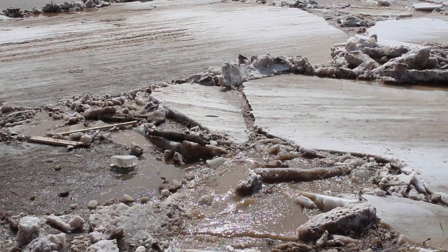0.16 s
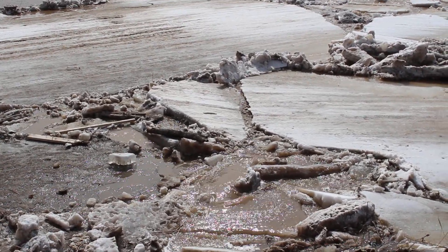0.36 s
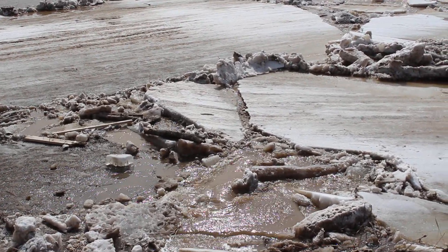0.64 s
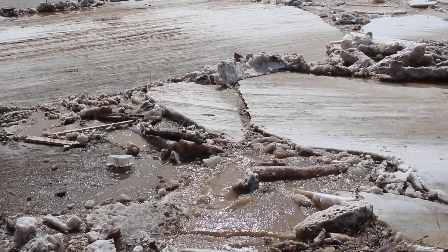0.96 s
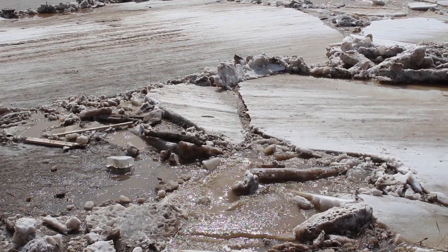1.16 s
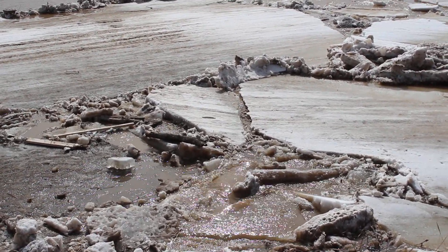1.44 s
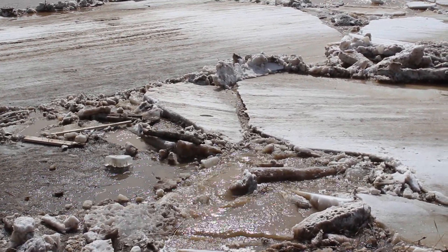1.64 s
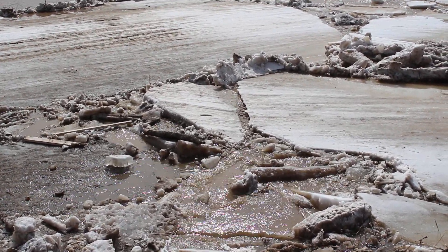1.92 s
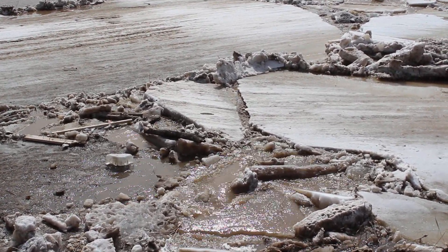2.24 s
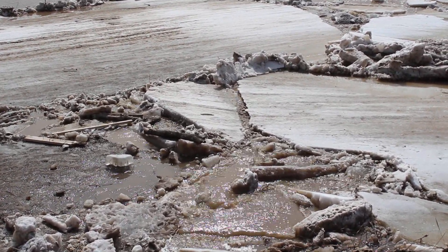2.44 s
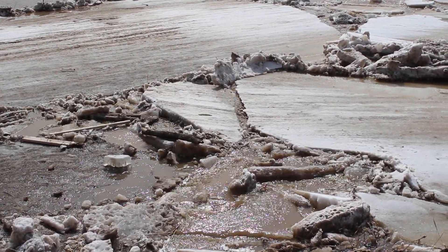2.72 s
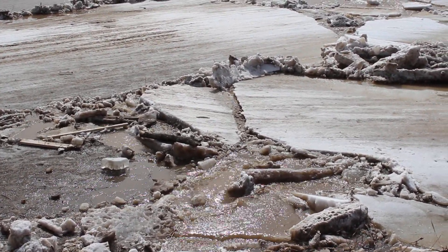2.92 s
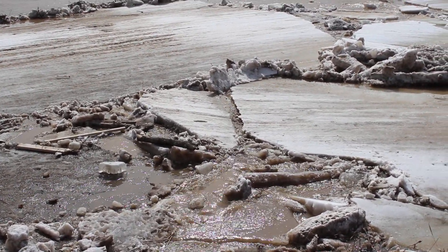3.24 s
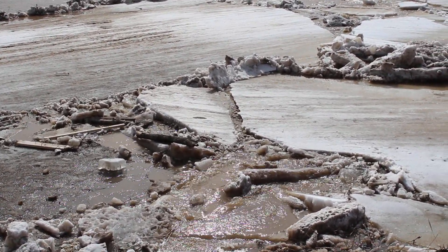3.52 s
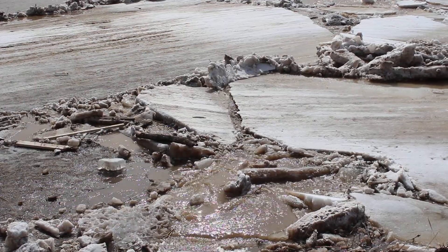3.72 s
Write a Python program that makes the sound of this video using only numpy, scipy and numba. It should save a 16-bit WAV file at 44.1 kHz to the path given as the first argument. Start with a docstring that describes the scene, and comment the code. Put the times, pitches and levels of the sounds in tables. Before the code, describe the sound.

Wind buffeting on a small stereo microphone dominates: dull, low, irregular thumps jumping between left and right. It is busy from 0 to 0.9 seconds, somewhat looser until 1.6, then surges to distorted blasts around 1.7-2.0. It eases through 2.2-3.5 and slams hard on the left at 3.8. Faint meltwater rushes steadily beneath, bubbling, with tiny splashes and ice ticks, densest around 1-2.4, dipping under loud gusts.

```python
"""Icy meltwater in gusty wind

Meltwater rushes between jammed ice slabs: bands of noise, with bubbles and ice crumbs as tiny rings.
Splashes and ice chinks are a tick plus a cluster of short rings. Wind buffets the two ports of a small
camera microphone as low thumps, and its stereo widener copies each one upside down to the other side.
The loudest buffets hit full scale, and the gain control turns everything down, so the river ducks."""
import sys
import numpy as np
from scipy import signal
from scipy.fft import rfft, irfft
from scipy.io import wavfile
from scipy.ndimage import uniform_filter1d
from numba import njit

SR = 44100
rng = np.random.default_rng(int(sys.argv[2]) if len(sys.argv) > 2 else 0)


def output_pcm(signal):
    """Save a mono or channel-first signal as 16-bit PCM at the path in sys.argv[1].

    Samples are clipped to [-1, 1] before scaling.
    """
    pcm = np.clip(np.atleast_2d(signal).T, -1, 1) * 32767
    wavfile.write(sys.argv[1], SR, np.round(pcm).astype(np.int16))


N = 170667  # length of the sound in samples

# How loud the river is heard, including slow drifts of the recorder's gain.
# Each row: time in seconds, level in dB.
RIVER_LEVEL = [(0, -41.5), (.3, -41.5), (.6, -44), (.9, -43), (1.2, -39), (1.45, -37.5), (1.65, -37.5),
               (1.9, -37), (2.1, -37.5), (2.45, -41), (2.7, -40), (3.1, -37.5), (3.4, -38.5), (3.87, -38.5)]
# The tone colour of the rushing water. Each row: frequency in Hz, relative level in dB per Hz.
RIVER_COLOUR = [(250, 10), (400, -3), (690, 0.5), (1000, -2.5), (1500, -7), (1900, -2), (2400, -9.5),
                (3300, -13), (4340, -15.5), (5080, -21), (8410, -24), (12000, -33), (15600, -39)]
# How wide the river sounds. Each row: frequency in Hz, side (left-right difference) minus mid in dB.
RIVER_WIDTH = [(300, -18.5), (1400, -15), (3000, -13.5), (6000, -9.5), (9000, -12), (13000, -8.5)]
# Splashes and ice chinks. Each row: start in seconds, level in dB before SPLASH_DB is added,
# centre pitch in Hz, length in ms before SPLASH_RING, pitch spread in octaves before SPLASH_SPREAD.
SPLASHES = [(0.0985, -52, 9043.0, 5.1, 0.44), (0.1464, -53, 5424.0, 3.6, 0.23),
            (0.5985, -50, 4300, 3.6, 0.28), (0.9308, -39, 1970, 9.4, 0.27), (0.9533, -54, 7400, 3.6, 0.17),
            (0.953, -41, 3400, 7.3, 0.75), (1.0977, -57, 10043.0, 3.6, 0.29),
            (1.1891, -54, 8242.0, 3.6, 0.21), (1.2479, -57, 10228.0, 4.4, 0.34),
            (1.2479, -59, 7960, 3.6, 0.35), (1.2744, -36.5, 2570, 12.3, 0.48),
            (1.34, -37.5, 4800, 10.2, 1.39), (1.401, -35.5, 2770, 6.5, 1), (1.7493, -44, 3820.0, 6.5, 0.51),
            (1.784, -51, 7774.0, 5.8, 0.31), (1.8023, -47.5, 6300, 9.4, 1.1),
            (1.8095, -50, 7400, 9.4, 0.43), (1.8139, -41.5, 4420, 7.3, 0.51),
            (1.8585, -46.5, 4131.0, 5.8, 0.83), (1.866, -68, 9427.0, 3.6, 0.23),
            (1.9513, -36, 3262.0, 5.1, 0.46), (2.0136, -52, 7160, 3.6, 0.18),
            (2.0207, -53, 9660.0, 4.4, 0.39), (2.021, -36, 3200, 6.5, 1.5), (2.0497, -74, 9000, 8.7, 0.73),
            (2.0497, -47, 6021.0, 5.1, 0.3), (2.07, -50, 8464.0, 4.4, 0.34), (2.236, -57.4, 6800, 8.0, 0.9),
            (2.3125, -38.2, 1849.0, 5.8, 0.4), (2.3726, -40, 3270, 4.4, 0.51),
            (2.5475, -50, 5752.0, 5.1, 0.67), (2.578, -54, 9400, 5.8, 0.51),
            (2.6745, -57, 10040.0, 4.4, 0.25), (2.9792, -52, 8700, 11.6, 0.79),
            (3.0041, -43, 3877.0, 5.8, 0.52), (3.1527, -56, 8800, 4.4, 0.22),
            (3.2571, -59, 10326.0, 2.9, 0.28), (3.3323, -45.5, 4600, 8.7, 1.1), (3.5, -49, 7300, 3.6, 0.57),
            (3.5, -50.5, 4900, 7.3, 0.64), (3.5256, -58.0, 8600, 3.6, 0.28),
            (3.7607, -50, 2650.0, 10.2, 0.66), (3.7615, -55.5, 6400, 4.4, 0.39),
            (3.7687, -58, 8767.0, 7.3, 0.22), (3.782, -66, 10729.0, 13.1, 0.73),
            (3.7827, -49.5, 6030, 5.1, 1.2)]
# Wind between the big buffets. Each row: time in seconds, left port level in dB,
# right port level in dB, brightness in dB (which moves the pitch of the small eddies).
GUSTS = [(0.0, -16.5, -33, -2), (0.07, -29, -27.0, -5), (0.15, -21, -18.5, -6.0), (0.25, -22.5, -23, -12),
         (0.4, -20, -19, -4), (0.5, -15, -13, 2), (0.65, -20, -16, -5), (0.8, -18.0, -16, 0),
         (0.92, -19.5, -15.5, -11), (1.02, -15.5, -19, -2), (1.12, -24, -23, -11),
         (1.24, -24.0, -20.5, -7.5), (1.33, -15.5, -17.5, -9), (1.42, -25.0, -16.5, -5),
         (1.5, -24, -27, -14.5), (1.59, -22, -26, -18.5), (1.7, -18, -13.5, -6.5),
         (1.8, -13.5, -10.5, -11.5), (1.9, -9, -4.5, -9.0), (1.98, -11.5, -46, -6.0), (2.05, -15, -20, -12),
         (2.14, -22, -24, -10), (2.25, -17, -17, -13), (2.34, -27, -17.5, -15), (2.45, -25, -19, -4),
         (2.55, -22.5, -21, -14.5), (2.68, -25, -31.5, -11.5), (2.8, -16.5, -25, -12.5),
         (2.92, -22, -20, -16), (3.05, -24, -18.5, -13), (3.14, -27.0, -27.5, -9.5),
         (3.22, -24.0, -32, -14), (3.33, -32, -39, -16), (3.42, -24.0, -25.5, -10),
         (3.5, -25.5, -29.0, -16), (3.6, -13.5, -14, -6.0), (3.7, -13, -14.5, -12.5), (3.8, -18, -24, -8.5),
         (3.87, -18, -13.5, -3)]
# Big wind buffets. Each row: time of the middle in seconds, port (-1 left, +1 right),
# level in dB before the snap is added, pitch in Hz, length in cycles (width at half height).
BUFFETS = [(0.0379, -1.0, -7, 122, 1.1), (0.1012, -1.0, -12, 123, 2.1), (0.1014, 1.0, -5, 219, 0.92),
           (0.1247, 1.0, -4, 148.0, 0.33), (0.2491, -1.0, -7, 152, 0.99), (0.2614, 1.0, -8.5, 200, 0.82),
           (0.289, 1.0, -7, 143, 0.82), (0.298, -1.0, -10.5, 129.0, 0.74), (0.3287, 1.0, -9, 220, 0.9),
           (0.3526, 1.0, -9, 175.0, 1.7), (0.3919, -1.0, -3.5, 145, 0.36), (0.418, 1.0, -4.8, 171.0, 0.8),
           (0.4529, 1.0, -1.5, 170, 0.95), (0.512, 1.0, 1, 220, 0.84), (0.5306, -1.0, -12, 172.0, 2),
           (0.542, 1.0, -19, 173, 0.59), (0.5675, 1.0, -7, 177, 1.1), (0.5983, -1.0, -4, 210, 0.6),
           (0.6411, 1.0, -3, 173, 0.89), (0.6585, 1.0, -8, 197, 1.1), (0.6836, -1.0, -2.8, 198.0, 0.6),
           (0.7068, 1.0, -9.5, 219.0, 0.84), (0.7244, -1.0, -12.5, 193, 2.1),
           (0.7582, 1.0, -7.5, 175.0, 0.69), (0.79, -1.0, -6.5, 170, 1.7), (0.8076, 1.0, -10.5, 156, 1.8),
           (0.8373, -1.0, -12, 165, 1.4), (0.8539, 1.0, -15, 174, 1.4), (0.9946, -1.0, -12.5, 178, 1.5),
           (1.0274, 1.0, -11.5, 148.0, 0.6), (1.0497, 1.0, -6.5, 177, 0.72),
           (1.169, -1.0, -12.5, 124.0, 1.6), (1.1925, 1.0, -6.5, 137, 0.56),
           (1.2851, -1.0, -2.5, 120, 0.94), (1.306, 1.0, -1.5, 150, 0.77), (1.3228, -1.0, -8, 152, 1.2),
           (1.3644, -1.0, -10, 214, 1.6), (1.4138, 1.0, -5.5, 257, 0.83), (1.6743, 1.0, 0, 195, 0.62),
           (1.676, -1.0, -0.8, 141, 1.1), (1.7219, 1.0, -4, 194, 0.67), (1.7369, -1.0, -6, 114.0, 2),
           (1.757, 1.0, -4, 160, 1.5), (1.7574, -1.0, -2.5, 125.0, 1.3), (1.8044, -1.0, -9, 123, 0.8),
           (1.8151, 1.0, -9, 117.0, 0.6), (1.8491, 1.0, 2, 141, 0.59), (1.8728, -1.0, -1, 147, 3.1),
           (1.876, 1.0, 5, 203, 0.33), (1.921, 1.0, 5.9, 216, 2), (1.9614, 1.0, -0.5, 212, 1.6),
           (1.984, 1.0, 2.8, 226, 0.89), (2.0982, -1.0, -8.6, 126, 2.7), (2.1761, -1.0, -3.5, 110, 1.3),
           (2.186, 1.0, -5, 142, 0.8), (2.2111, 1.0, -3, 150, 1.4), (2.3193, 1.0, -3, 138, 0.74),
           (2.3375, 1.0, -4, 126, 2.56), (2.389, -1.0, -9.6, 124, 1.3), (2.392, 1.0, -1, 127, 1.24),
           (2.5368, 1.0, -6, 140.0, 0.84), (2.5763, -1.0, -12.5, 124, 1.7), (2.6262, -1.0, -5.5, 132, 1.1),
           (2.6495, -1.0, -5.5, 112, 1.2), (2.7672, -1.0, -6, 147, 0.63), (2.7686, 1.0, -9.5, 149, 2.5),
           (2.8159, -1.0, -11, 132, 0.54), (2.897, -1.0, -14, 144.0, 0.68), (2.9799, -1.0, -13, 107, 1.3),
           (2.9887, 1.0, -9, 144.0, 1.1), (3.0554, -1.0, -7.5, 127, 0.75), (3.0693, 1.0, -8, 151, 0.57),
           (3.0955, 1.0, -9.5, 139.0, 1.3), (3.39, -1.0, -7.9, 108, 0.93), (3.4798, -1.0, -9, 107, 1.04),
           (3.5747, -1.0, -10.5, 187, 4.3), (3.5886, 1.0, -1.5, 195, 0.89), (3.6113, -1.0, -19, 137.0, 0.6),
           (3.6545, -1.0, -4.5, 177, 0.84), (3.6829, -1.0, -6, 115, 3.2), (3.7145, -1.0, -2, 130, 0.72),
           (3.7907, -1.0, 6.5, 123, 1.07), (3.811, -1.0, 4, 147, 1.5), (3.8359, -1.0, 6.5, 186.0, 1.3)]

# River: how far its level wanders, how often it gets a new level, and its lean to the left
SWELL_DB, FLICKER_DB = 1.42, 1.5
SWELL_PER_S, FLICKER_PER_S = 35, 40
RIVER_PAN_DB = .5

# Tiny bubbles: level is relative to the rush, cycles last until the ring is 60 dB down
FIZZ_PER_S, FIZZ_HZ, FIZZ_SPREAD_OCT, FIZZ_CYCLES = 1300, 1899.5, 0.746, 37
FIZZ_DB, FIZZ_SCATTER_DB = -4.5, 3.5
RING_TILT_DB_OCT = -3  # higher bubbles and crumbs are quieter

# Ice crumbs, in the same units
CRACKLE_PER_S, CRACKLE_HZ, CRACKLE_SPREAD_OCT, CRACKLE_CYCLES = 90, 5100, .5, 4.9
CRACKLE_DB, CRACKLE_SCATTER_DB = -21.5, 3

# Splashes: added level, factors for length and pitch spread, rings in each, and the opening tick
SPLASH_DB, SPLASH_RING, SPLASH_SPREAD, DROPS = 10, 1.6, 0.66, 5
TICK_DB, TICK_CYCLES = -1, 8
GLIDE = 0.051  # upward bend of the rings of bubbles, crumbs and drops

# Wind: small eddies at each port, the snap inside every thump, and the low cut
EDDIES_PER_S, EDDY_HZ, EDDY_SPREAD_OCT, EDDY_OCT_PER_DB = 280, 190.2, 0.49, 0.0567
EDDY_CYCLES, EDDY_SCATTER_DB = 0.92, 3
SNAP_RATIO, SNAP_DB = 1.96, -14  # snap speed and level compared with the main dip
WIND_LOW_HZ = 37

# Microphone: share of the other side taken away, gain control, full scale, and top of the range
WIDEN = 0.38
CEILING_DB, ATTACK_S, RELEASE_S, CLIP_DB = -3.5, .0008, .3, 0
TOP_HZ = 15780


def amp(db):
    """Turn dB into a plain multiplier."""
    return 10 ** (np.asarray(db) / 20)


def curve(table, col):
    """Draw straight lines in time through one column of a table."""
    table = np.array(table, float)
    return np.interp(np.arange(N) / SR, table[:, 0], table[:, col])


def at_hz(table, hz):
    """Read a level from a table by frequency, on a musical (log) scale."""
    table = np.array(table, float)
    return np.interp(np.log(hz), np.log(table[:, 0]), table[:, 1])


def walk(rate):
    """Random levels, rate of them a second, smoothed twice; spread near 1."""
    hold = int(SR / rate)
    steps = np.repeat(rng.standard_normal(N // hold + 1), hold)
    smooth = uniform_filter1d(uniform_filter1d(steps, hold), hold)
    return 1.05 * smooth[:N]


def place(times, shapes, lead):
    """Sum short shapes into a track, each starting lead samples before its time."""
    at = (times * SR).astype(int)[:, None] + np.arange(shapes.shape[1])
    track = np.bincount(at.ravel(), shapes.ravel(), N + 8192)
    return track[lead:N + lead]


def rings(times, db, hz, cycles, glide):
    """Short rings with a soft start and a pitch bend; cycles counts until 60 dB down."""
    hz = np.minimum(hz, .3 * SR)
    turn = np.arange(768) / SR * hz[:, None]  # cycles since the start
    age = turn / np.reshape(cycles, (-1, 1))
    fade = np.minimum(age * 16, 1) * np.exp(-np.log(1000) * age)
    tone = np.sin(2 * np.pi * turn * (1 + glide * np.minimum(age, 1)))
    return place(times, amp(db)[:, None] * fade * tone, 0)


def scatter(per_s, hz, spread_oct, cycles, scatter_db, tilt_db):
    """Rings at random times, pitches and sizes, scaled to an average (rms) level of 1."""
    count = int(per_s * N / SR)
    times, size = rng.random((count, 2)).T
    octs = spread_oct * np.clip(rng.standard_normal(count), -1.6, 2.5)
    db = -scatter_db * np.log(1 - .995 * size) + tilt_db * octs  # a few are much louder
    out = rings(times * N / SR, db, hz * 2 ** octs, cycles, GLIDE)
    return out / out.std()


def rush():
    """Flowing water: third-octave noise bands that surge together and flicker alone."""
    out, swell = 0, walk(SWELL_PER_S)
    freqs = np.fft.rfftfreq(N, 1 / SR) + 1
    for hz in 250 * 2 ** np.arange(0, 6.2, 1 / 3):
        bell = np.exp(-(np.log2(freqs / hz) * 4) ** 2)
        band = bell * amp(at_hz(RIVER_COLOUR, freqs))
        mid, side = irfft(rfft(rng.standard_normal((2, N))) * band, N)
        side = amp(at_hz(RIVER_WIDTH, hz)) * side
        gain = amp(SWELL_DB * swell + FLICKER_DB * walk(FLICKER_PER_S))
        out = out + gain * (mid + side * np.array([[1], [-1]]))
    return out / out.std()


def bubbles():
    """Tiny bubbles plink: each is a short ring that bends upward."""
    fizz = scatter(FIZZ_PER_S, FIZZ_HZ, FIZZ_SPREAD_OCT, FIZZ_CYCLES,
                   FIZZ_SCATTER_DB, RING_TILT_DB_OCT)
    return amp(FIZZ_DB) * fizz


def ice_crumbs():
    """Ice crumbs crackle: fewer, higher rings that last only a few cycles."""
    crackle = scatter(CRACKLE_PER_S, CRACKLE_HZ, CRACKLE_SPREAD_OCT, CRACKLE_CYCLES,
                      CRACKLE_SCATTER_DB, RING_TILT_DB_OCT)
    return amp(CRACKLE_DB) * crackle


def river():
    """Rush, bubbles and crumbs share one loudness curve, which includes slow gain drift."""
    water = rush() + bubbles() + ice_crumbs()
    pan = amp([[RIVER_PAN_DB / 2], [-RIVER_PAN_DB / 2]])
    return water * amp(curve(RIVER_LEVEL, 1)) * pan


def ice():
    """Each splash is a dry tick, one ring at its centre pitch and shorter drops scattered around it."""
    start, db, hz, ms, spread = np.repeat(np.array(SPLASHES, float), DROPS, axis=0).T
    db = db + SPLASH_DB
    order = np.tile(np.arange(DROPS) / DROPS, len(SPLASHES))  # 0 is the main ring
    late, pitch = rng.random((len(start), 2)).T
    ticks = rings(start[::DROPS], db[::DROPS] + TICK_DB, 1.33 * hz[::DROPS], TICK_CYCLES, 0)
    hz = hz * 2 ** (SPLASH_SPREAD * spread * (pitch - .5) * (order > 0))
    cycles = SPLASH_RING * ms / 1000 * hz / (1 + 1.4 * order)
    times = start + ms / 1400 * order * late
    return ticks + rings(times, db - 6 * order, hz, cycles, GLIDE)


def dip(turn, cycles):
    """A downward pressure peak in a bell-shaped envelope, cycles wide at half height."""
    bell = np.exp(-4 * np.log(2) * (turn / cycles) ** 2)
    return -bell * np.cos(2 * np.pi * turn)


def thumps(times, db, hz, cycles):
    """Passing eddies suck at the port: a pressure dip with a quicker snap at its core."""
    turn = np.arange(-1024, 1024) / SR * hz[:, None]
    snap = amp(SNAP_DB) * dip(SNAP_RATIO * turn, 0.95)
    shape = dip(turn, np.reshape(cycles, (-1, 1))) + snap
    return place(times, amp(db)[:, None] * shape, 1024)


def small_eddies(port):
    """A patter of small thumps at random times, higher in pitch when the gust is brighter."""
    count = int(EDDIES_PER_S * N / SR)
    times, size = rng.random((count, 2)).T
    bright = curve(GUSTS, 3)[(times * N).astype(int)]
    octs = EDDY_SPREAD_OCT * rng.standard_normal(count) + EDDY_OCT_PER_DB * bright
    hz = np.clip(EDDY_HZ * 2 ** octs, 40, 900)
    db = -EDDY_SCATTER_DB * np.log(1 - .98 * size)
    small = thumps(times * N / SR, db, hz, EDDY_CYCLES)
    return small / small.std() * amp(curve(GUSTS, port))


def wind():
    """Each port has its own eddies: the listed buffets over a patter of small ones."""
    out, big = [], np.array(BUFFETS, float)
    for port in (1, 2):  # left, right
        mine = big[(big[:, 1] > 0) == (port == 2)]
        buffets = thumps(mine[:, 0], *mine[:, 2:].T)
        out.append(small_eddies(port) + buffets)
    low_cut = signal.butter(1, WIND_LOW_HZ, "high", fs=SR)
    return signal.lfilter(*low_cut, np.array(out))


def scene():
    """River, ice and wind added together, left and right."""
    return river() + ice() + wind()


@njit
def follow(x, rise, fall):
    """Peak follower: quick up, slow down."""
    y, level = np.empty(len(x)), 0.
    for i in range(len(x)):
        level += (x[i] - level) * (rise if x[i] > level else fall)
        y[i] = level
    return y


def record(dry):
    """Widener, gain control driven by the louder channel, clipping at full scale, cut top."""
    wide = dry - WIDEN * dry[::-1]  # take away some of the opposite side
    peak = follow(np.abs(wide).max(0), 1 / (ATTACK_S * SR), 1 / (RELEASE_S * SR))
    gain = np.minimum(1, amp(CEILING_DB) / (peak + 1e-9))
    held = np.clip(wide * gain, -amp(CLIP_DB), amp(CLIP_DB))
    top_cut = signal.ellip(14, .2, 90, TOP_HZ, fs=SR, output="sos")
    return signal.sosfilt(top_cut, held)


dry = scene()
out = record(dry)
output_pcm(out)
```